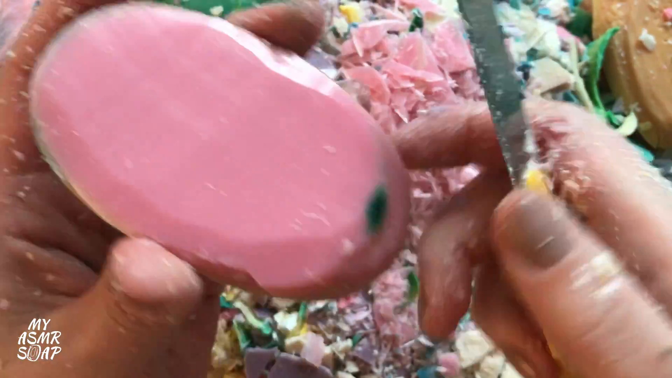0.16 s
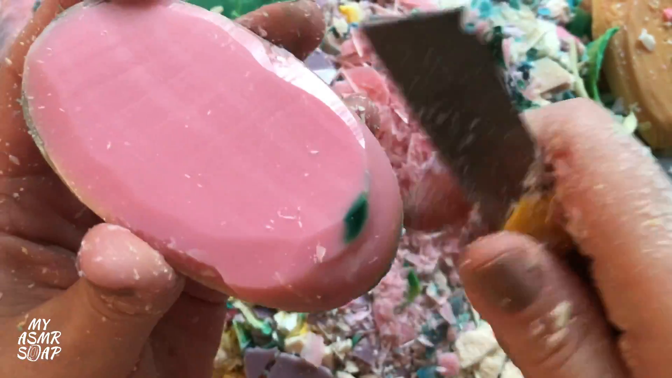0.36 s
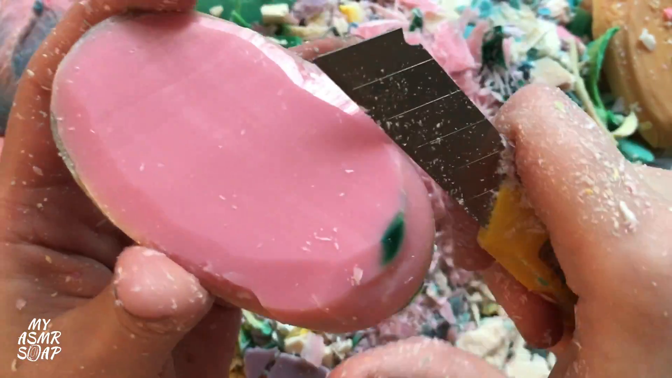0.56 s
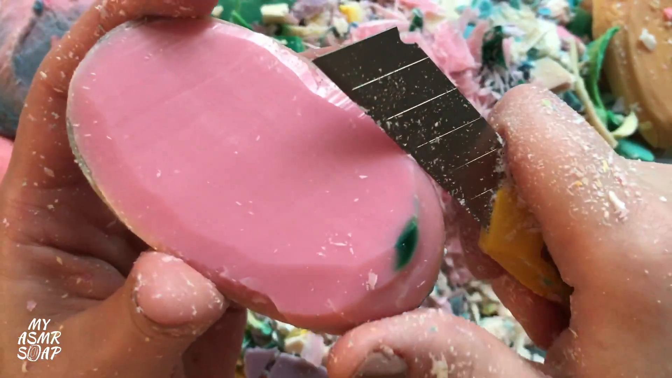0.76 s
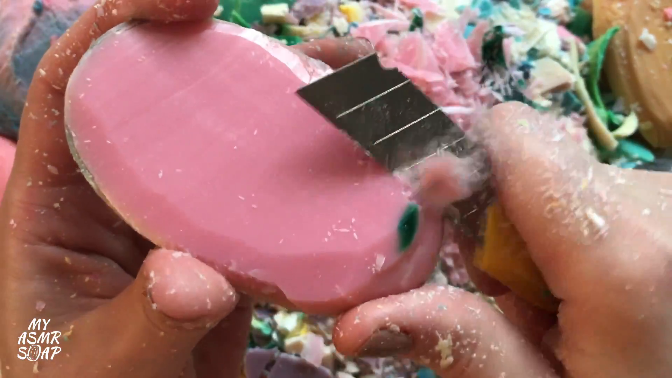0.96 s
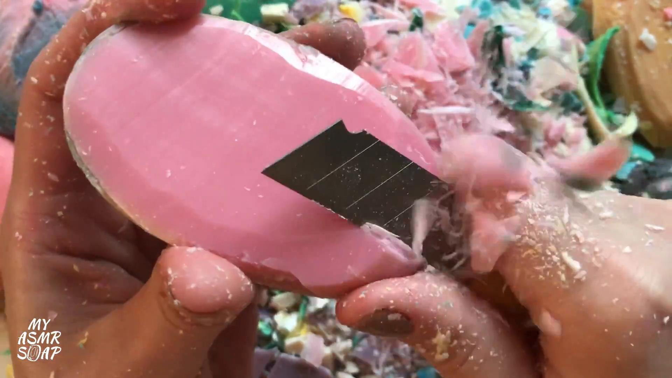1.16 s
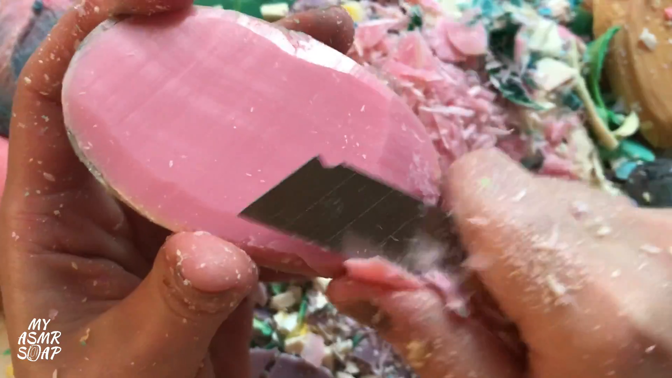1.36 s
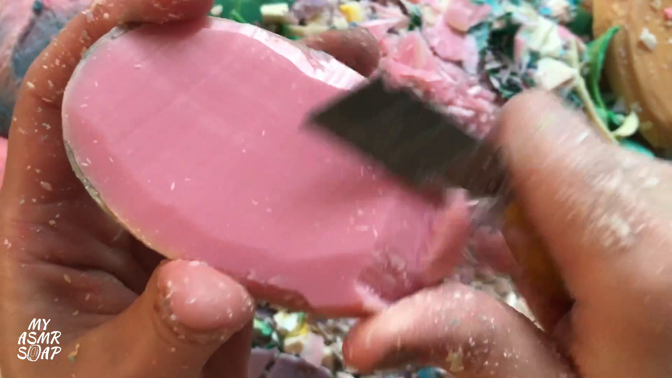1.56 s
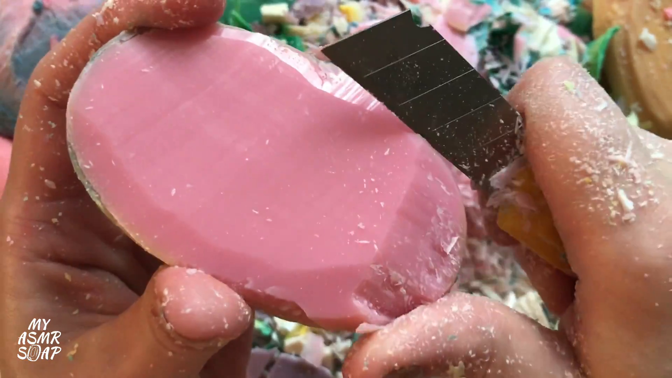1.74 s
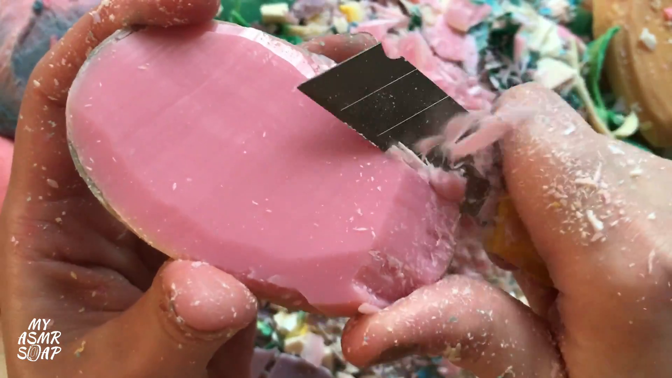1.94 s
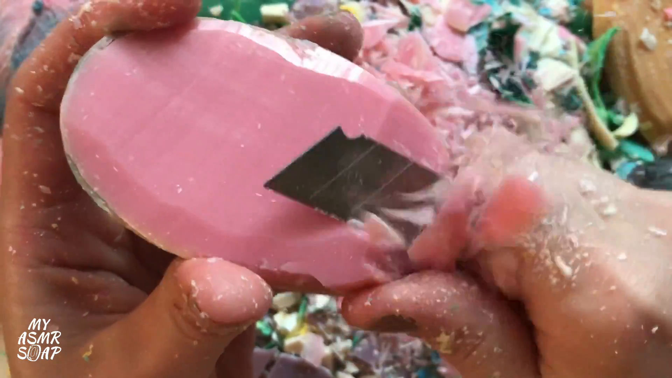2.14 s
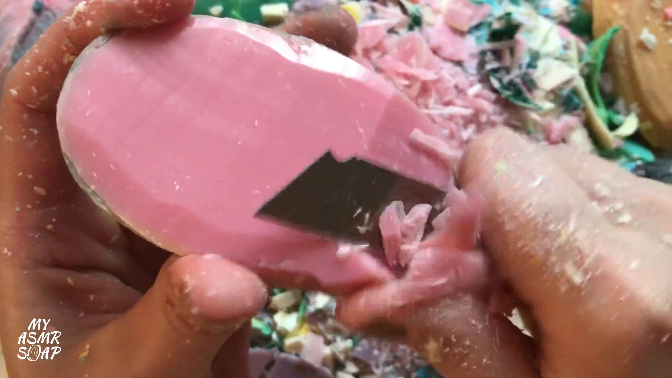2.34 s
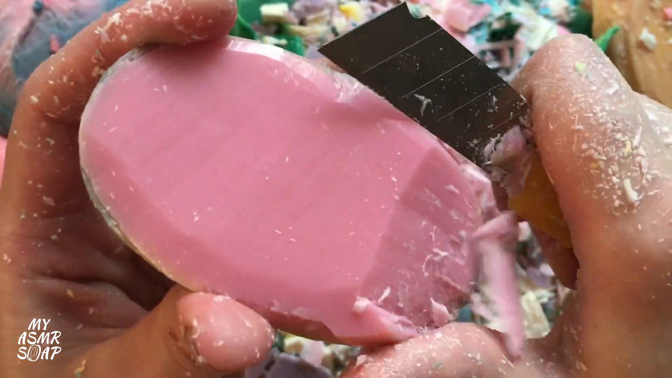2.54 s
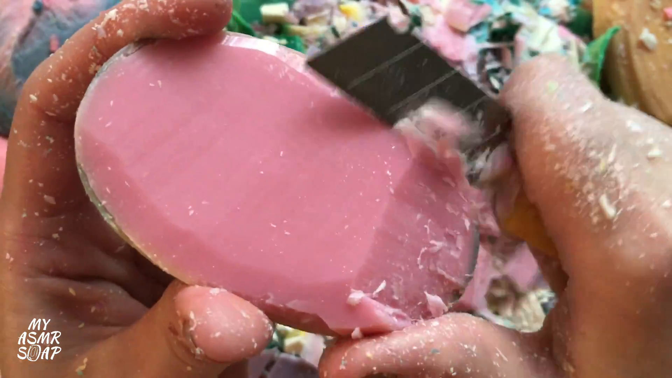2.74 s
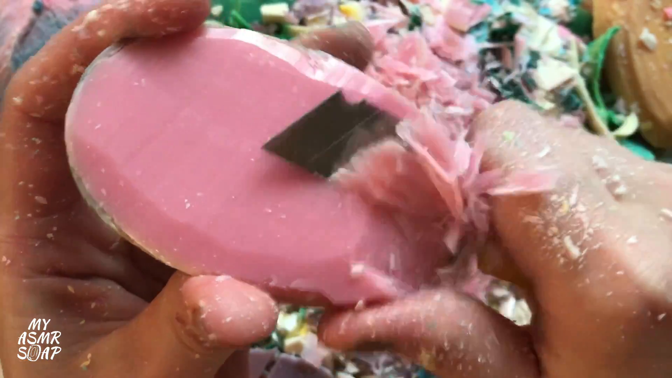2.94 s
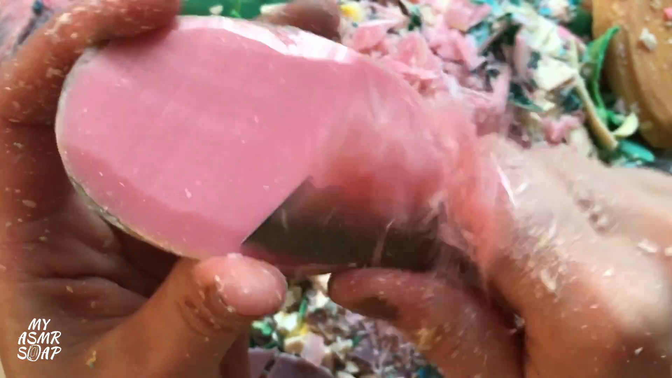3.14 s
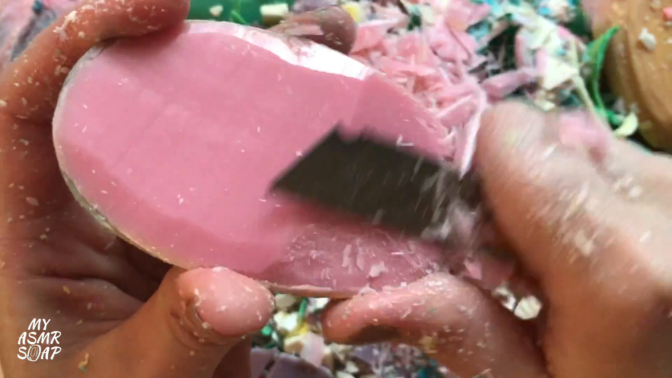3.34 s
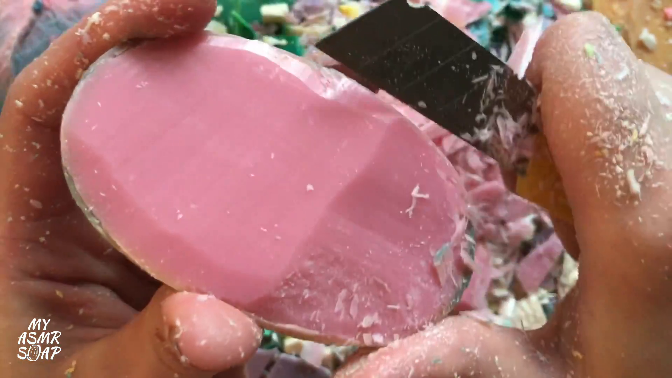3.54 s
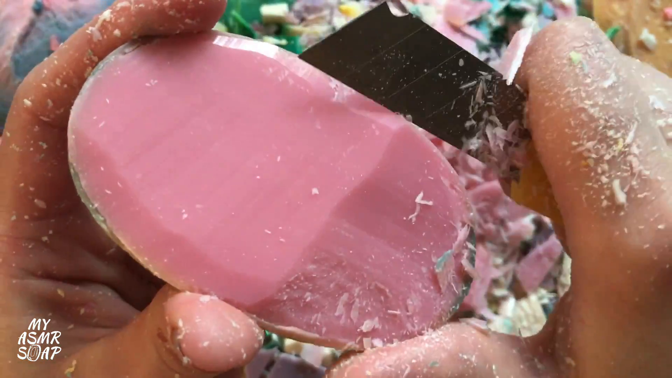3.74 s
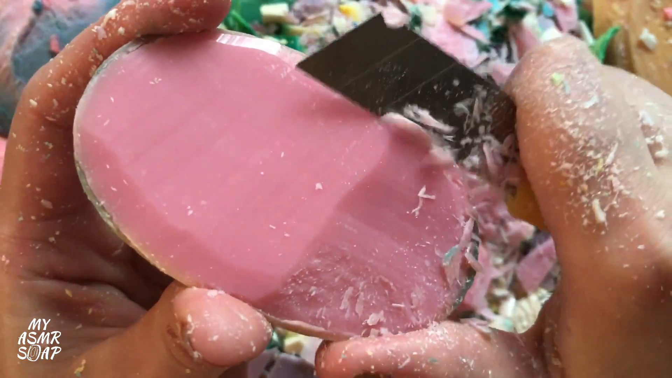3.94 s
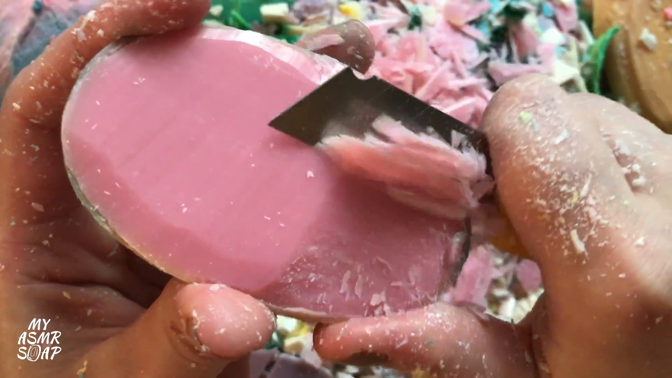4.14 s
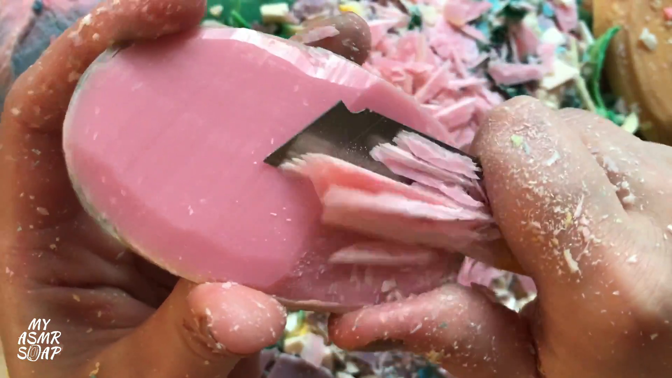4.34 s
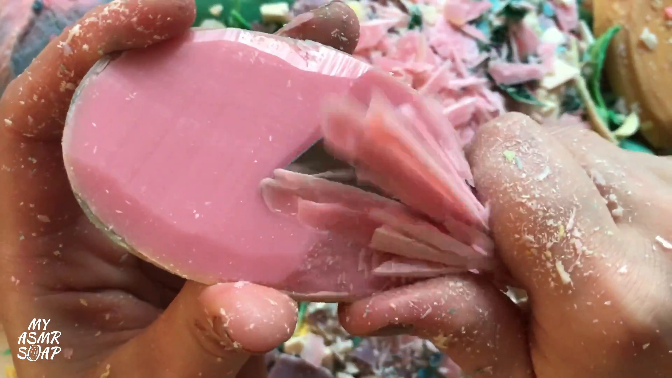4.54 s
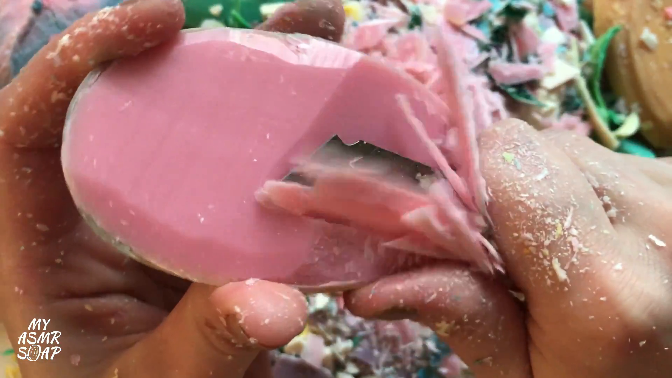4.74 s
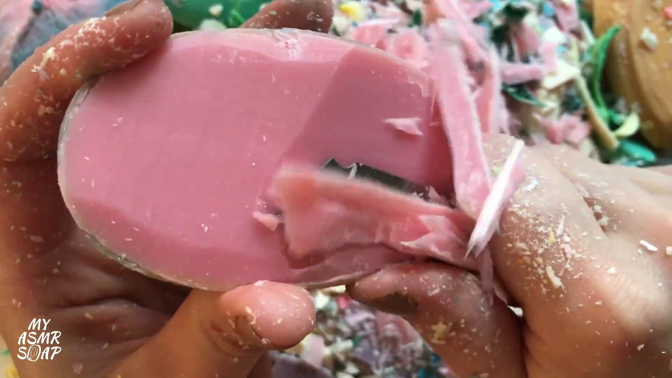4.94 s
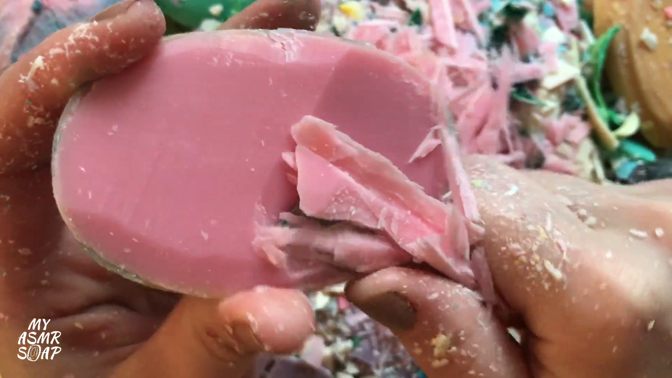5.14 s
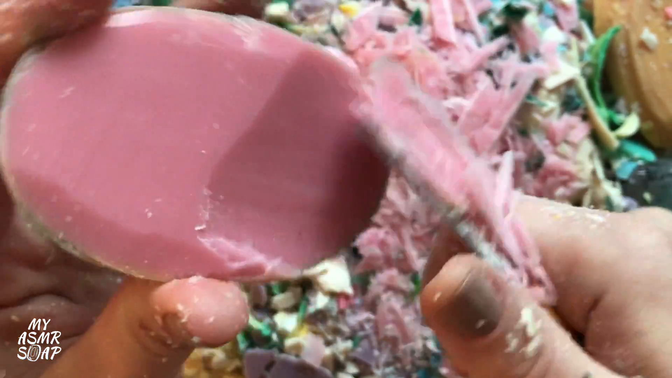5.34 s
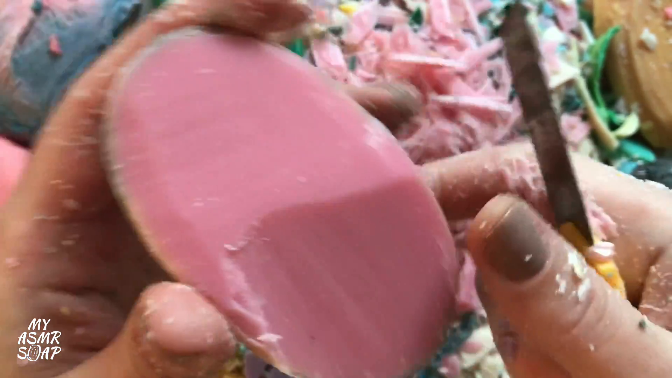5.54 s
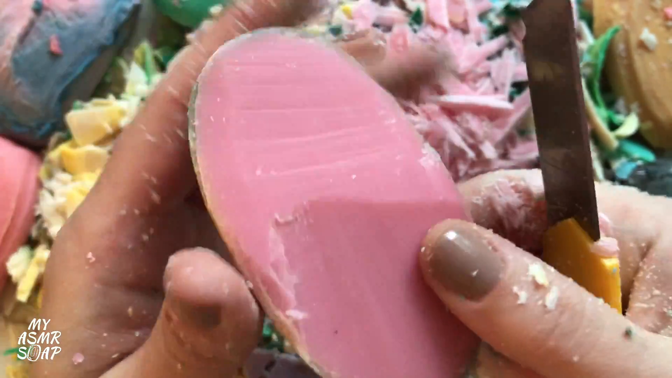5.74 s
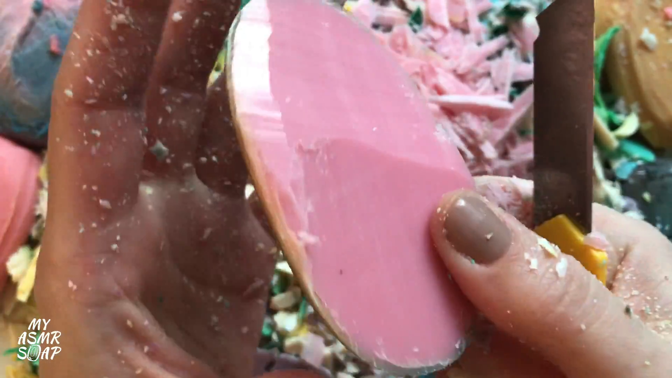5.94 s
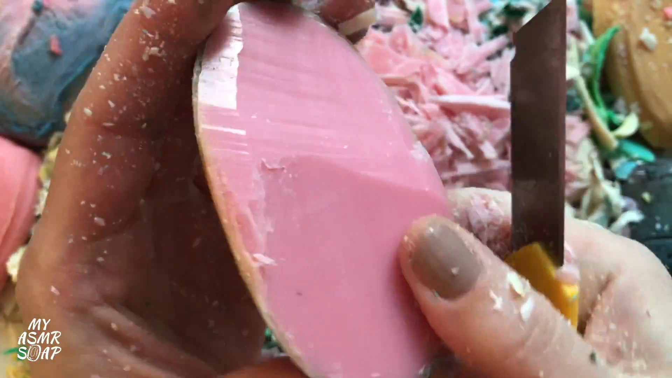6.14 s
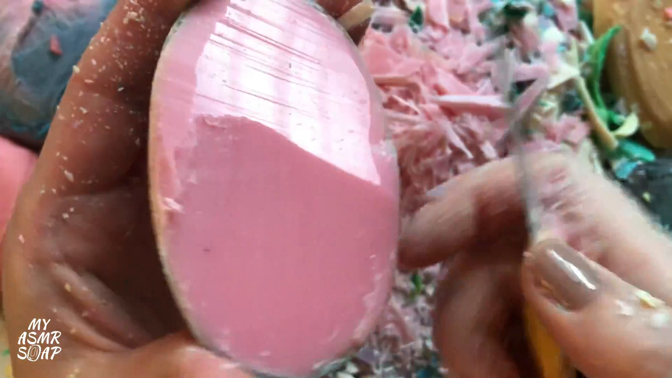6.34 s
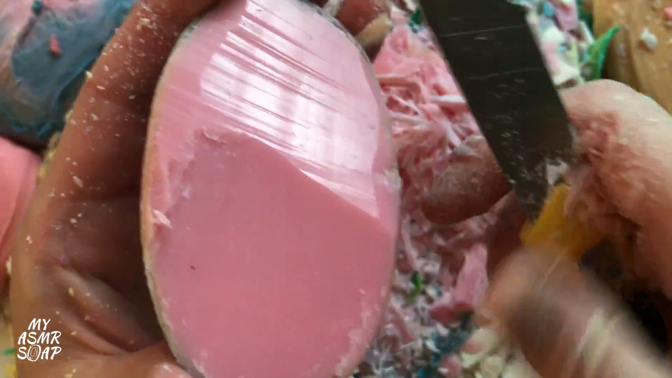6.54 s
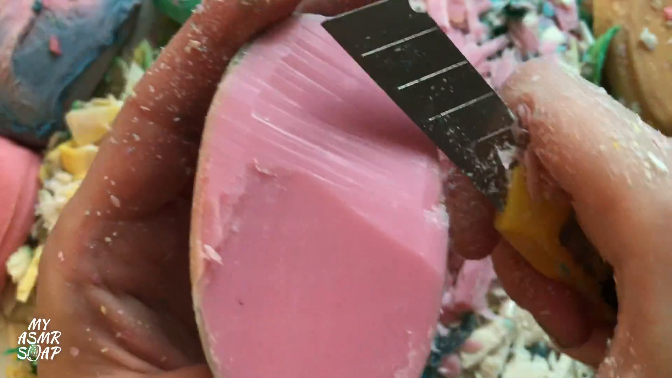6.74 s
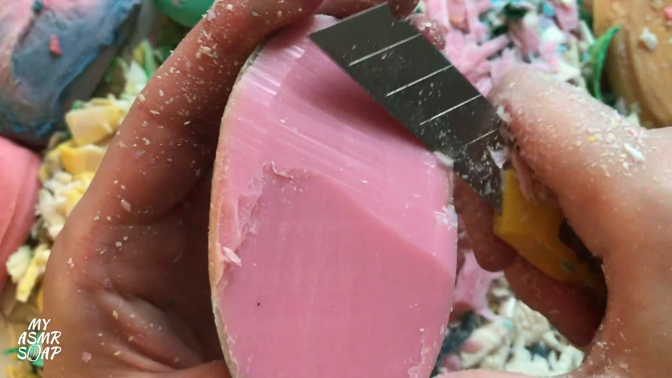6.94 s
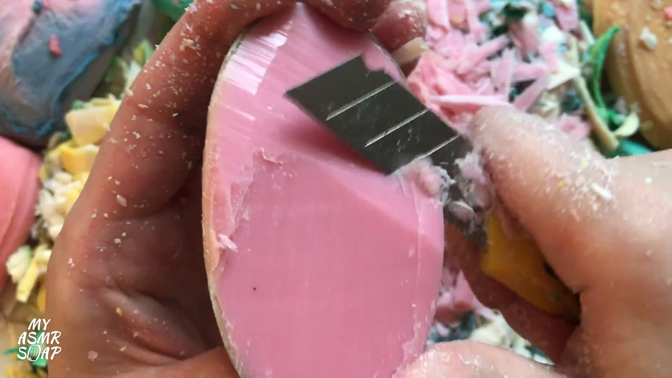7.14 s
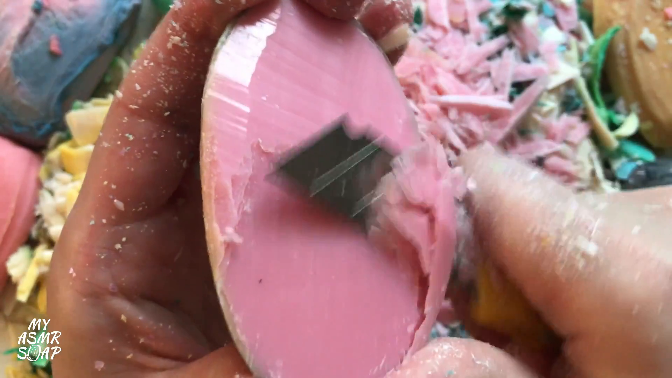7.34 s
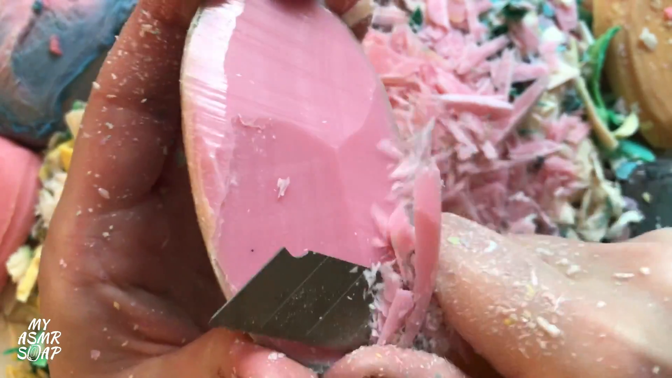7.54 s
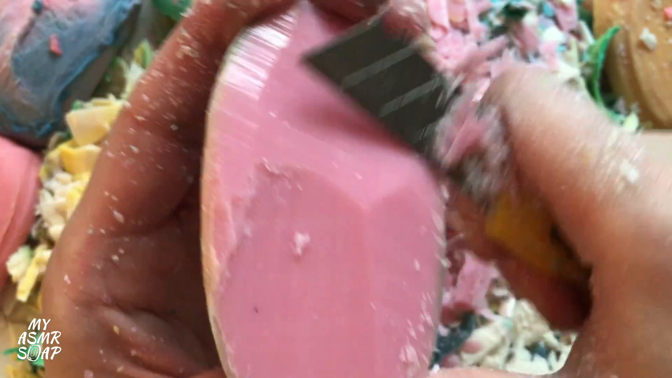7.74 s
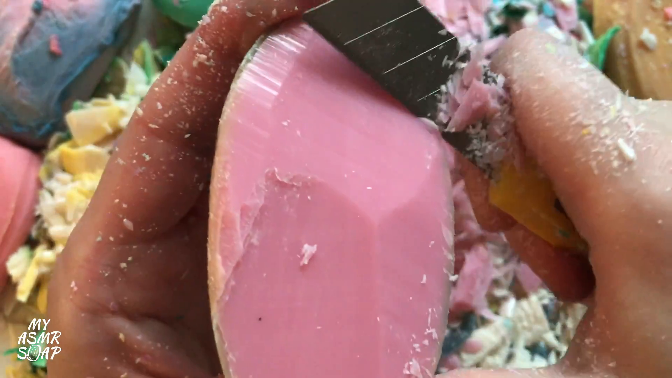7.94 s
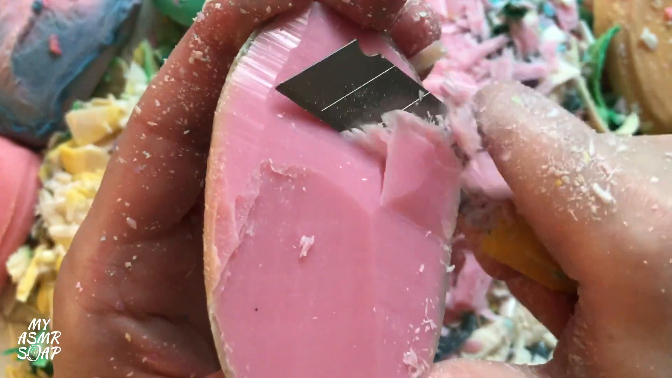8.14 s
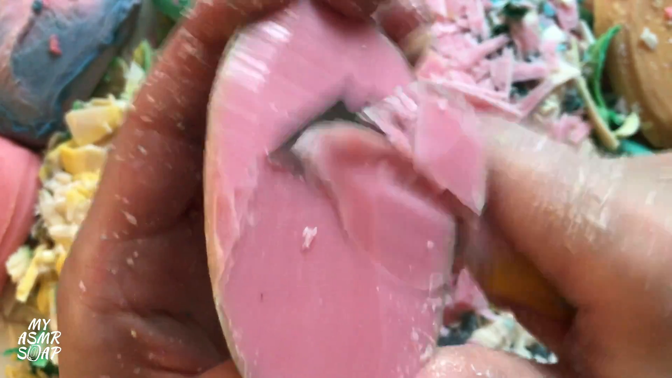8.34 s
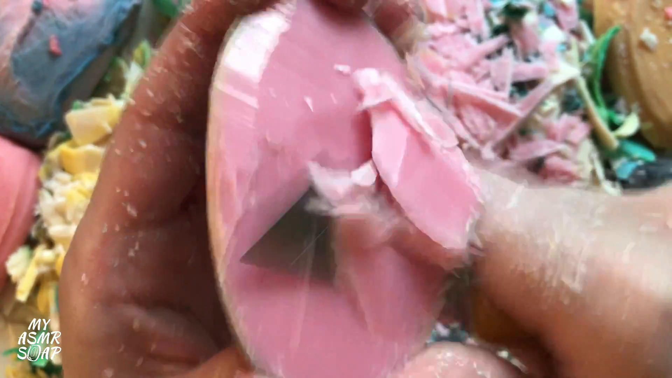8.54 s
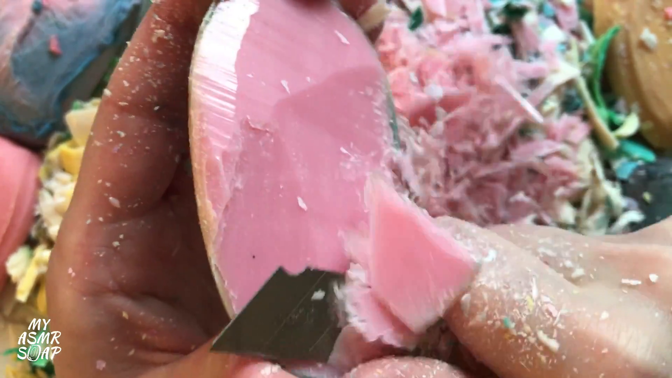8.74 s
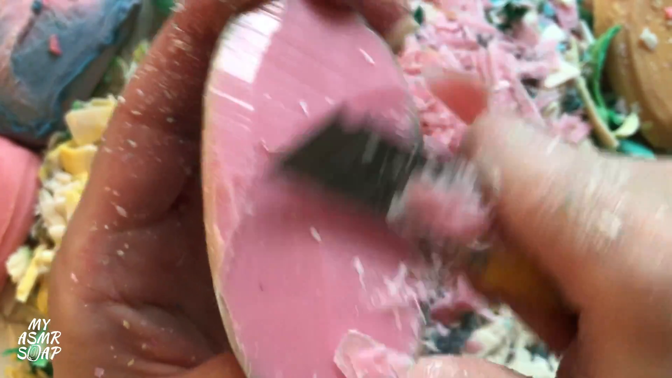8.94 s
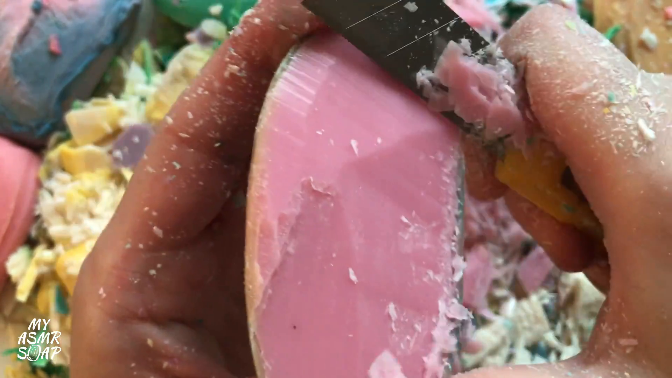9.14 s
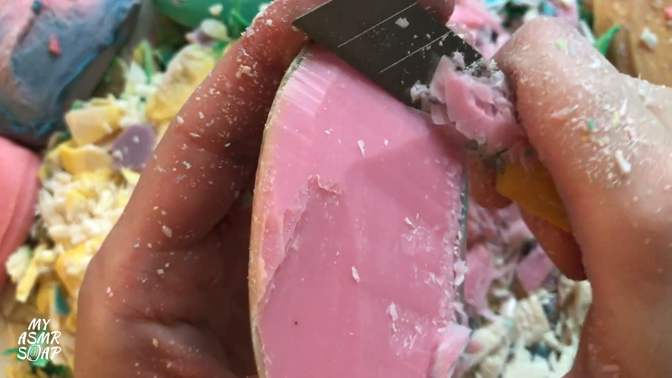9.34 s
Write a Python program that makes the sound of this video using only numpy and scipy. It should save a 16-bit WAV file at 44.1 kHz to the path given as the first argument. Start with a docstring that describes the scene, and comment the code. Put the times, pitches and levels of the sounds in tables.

```python
"""In a quiet room, close to the microphone, a snap-off knife blade shaves flakes off a dry bar of soap.
The room rumbles, hums and hisses faintly: shaped noise. The blade chatters in its holder: sparse taps on one mode.
Once the knife jumps out of the cut and knocks something hollow: two blows on decaying modes.
Crumbs crackle and the edge rubs: random ticks and hiss through the modes of blade and bar.
The soap breaks in short bursts of tiny cracks: swarms of noise pulses that ring those same modes."""
import sys
import numpy as np
from scipy import signal
from scipy.io import wavfile

SR = 44100
rng = np.random.default_rng(int(sys.argv[2]) if len(sys.argv) > 2 else 0)


def persist_wave(psi):
    """Save psi, clipped to +-1, as 16-bit WAV."""
    counts = np.round(np.clip(psi, -1, 1) * 32767).astype(np.int16)
    wavfile.write(sys.argv[1], SR, np.atleast_2d(counts).T)


N = 418509


def from_db(db):
    """Amplitude factor of a level in dB."""
    return 10 ** (np.asarray(db) / 20)


def rms_one(x):
    """Scale to an RMS of 1."""
    return x / np.sqrt(np.mean(x ** 2) + 1e-20)


def drift(rate_hz):
    """Slow random wandering of spread 1: noise at a fortieth of the rate, smoothed by a two-pole lowpass."""
    step = 40
    pole = np.exp(-2 * np.pi * rate_hz * step / SR)
    noise = rng.standard_normal(N // step + 2002)
    slow = signal.lfilter([1], [1, -2 * pole, pole * pole], noise)[2000:]  # drop the run-in
    return np.interp(np.arange(N) / step, np.arange(len(slow)), rms_one(slow))


def resonate(x, hz, width_hz):
    """Two-pole resonance with gain 1 on top."""
    pole = np.exp(-np.pi * width_hz / SR)
    feed = np.array([1, 0, -1]) * (1 - pole * pole) / 2
    feedback = [1, -2 * pole * np.cos(2 * np.pi * hz / SR), pole * pole]
    return signal.lfilter(feed, feedback, x + 1e-18)


def plateaus(rows, attack_db_per_s, release_db_per_s):
    """Power of events that rise, hold their level for their length and fall away."""
    t = np.arange(0, N, 32) / SR
    start, length, level_db = np.transpose(rows)[:, :, None]
    rise_loss_db = attack_db_per_s * np.maximum(start - t, 0)
    fall_loss_db = release_db_per_s * np.maximum(t - start - length, 0)
    power = np.sum(from_db(level_db - rise_loss_db - fall_loss_db) ** 2, 0)
    return np.interp(np.arange(N) / SR, t, power)


# Spectrum of the quiet room's air. Each row: pitch in Hz, relative density in dB per Hz.
AIR_SPECTRUM = [(12, -37), (20, -16.5), (55, -6), (79, -9.5), (117, -13), (179, -4.5), (230, -7),
                (428, -22), (839, -20.5), (2240, -33.5), (2660, -31), (6000, -40), (10500, -39),
                (15200, -37), (16500, -61.5)]
AIR_DB = -65


def air(patchy_db=.7):
    """Hiss and low murmur of the room: half-octave bands of noise, each flickering a little."""
    out, white = 0, rng.standard_normal((2, N))
    edges_hz = 20 * 2 ** np.arange(0, 10.1, .5)
    hz_points, db_points = np.transpose(AIR_SPECTRUM)
    for k, (low, high) in enumerate(zip(edges_hz, edges_hz[1:])):
        band_filter = signal.butter(2, [low, high], "band", fs=SR, output="sos")
        band = signal.sosfilt(band_filter, white[k % 2])  # neighbours use separate noises
        band_db = np.interp(np.log(low * high) / 2, np.log(hz_points), db_points)
        out = out + band * from_db(band_db + patchy_db * drift(8))
    return from_db(AIR_DB) * rms_one(out)


# Swells of far rumble. Each row: start in seconds, length in seconds, level in dB.
RUMBLE_SWELLS = [(0.0, .95, -64.5), (1.95, 0.16, -61), (2.5, 0.77, -71), (3.37, 0.048, -60.5),
                 (3.68, 0.46, -63.5), (4.43, 0.073, -65.5), (4.8, 0.097, -63), (5.3, 0.38, -63.5),
                 (5.83, 0.34, -58.5), (6.3, .75, -65), (7.6, 0.57, -65.5), (8.4, 0.36, -74)]
RUMBLE_EDGE_DB_PER_S = 150


def far_rumble():
    """Noise twice through a low resonance, swelling and sinking at a distance."""
    rumble = resonate(resonate(rng.standard_normal(N), 55, 22), 55, 22)
    power = plateaus(RUMBLE_SWELLS, RUMBLE_EDGE_DB_PER_S, RUMBLE_EDGE_DB_PER_S)
    return np.sqrt(power) * rms_one(rumble)


# Faint hums that come and go. Each row: pitch in Hz, width of each resonance in Hz, mean level in dB.
HUM_BANDS = [(93, 14, -78), (138.5, 20, -74), (179.8, 57, -68.5), (242, 29, -75)]


def hums(waver_db=3.0):
    """Noise twice through narrow low resonances, each swelling on its own."""
    out = 0
    for hz, width_hz, db in HUM_BANDS:
        hum = resonate(resonate(rng.standard_normal(N), hz, width_hz), hz, width_hz)
        out = out + from_db(db + waver_db * drift(2.2)) * rms_one(hum)
    return out


ROOM_T60_S, WALL_CUT_HZ = 0.16, 4400


def room(x):
    """Diffuse echo: dying noise, the treble dying sooner."""
    t = np.arange(SR // 2) / SR
    low, high = rng.standard_normal((2, len(t)))
    low = signal.sosfilt(signal.butter(1, WALL_CUT_HZ, fs=SR, output="sos"), low)
    low = low * from_db(-60 * t / ROOM_T60_S)
    high = high * from_db(-8.0 - 60 * t / (0.54 * ROOM_T60_S))
    echo = (low + high) * np.minimum(t / 0.0007, 1)
    return signal.fftconvolve(x, echo / np.sqrt(np.sum(echo ** 2)))[:N]


# The unloaded blade chattering faintly in its holder. Each row: start in seconds, length in seconds, level in dB.
CHATTER_SPELLS = [(.65, 0.039, -78), (.79, .08, -78.5), (6.2, 0.044, -77), (6.32, 0.18, -79.5),
                  (6.87, 0.2, -77), (9.3, 0.088, -78.5)]
CHATTER_HZ, CHATTER_WIDTH_HZ, CHATTER_EDGE_DB_PER_S = 2280, 340, 206


def chatter(per_s=140.0, size_db=5.0):
    """Sparse light taps ring one blade mode, passed twice through its resonance."""
    taps = (rng.random(N) < per_s / SR) * from_db(size_db * rng.standard_normal(N))
    ringing = resonate(taps, CHATTER_HZ, CHATTER_WIDTH_HZ)
    ringing = resonate(ringing, CHATTER_HZ, CHATTER_WIDTH_HZ)
    power = plateaus(CHATTER_SPELLS, CHATTER_EDGE_DB_PER_S, CHATTER_EDGE_DB_PER_S)
    return np.sqrt(power) * rms_one(ringing)


# A light touch, then the blow. Each row: time in seconds, strength in dB.
KNOCK_BLOWS = [(3.3865, -30), (3.3903, -14)]
# Modes of the hollow thing struck. Each row: pitch in Hz, level in dB, time to fall 60 dB in seconds.
HOLLOW_MODES = [(200, -26, 0.24), (266, -27, 0.22), (319, -8, 0.2), (436, -17, .1), (540, -17, 0.09),
                (715, -15, 0.04), (940, -8, 0.05), (1240, -17, 0.05), (1820, -8, .03)]
RATTLE_DB, RATTLE_T60_S, RATTLE_TOP_HZ = -8, 0.26, 1690  # loose shudder after a knock
# the jolted blade hissing out
SHIVER_DB, SHIVER_T60_S, SHIVER_HZ, SHIVER_WIDTH_HZ = -20.5, .33, 5000, 5000


def dying(blows, t60_s):
    """Envelope that jumps at each blow and decays exponentially."""
    return signal.lfilter([1], [1, -from_db(-60 / (t60_s * SR))], blows + 1e-18)


def knock():
    """Blows ring the hollow modes and leave a dull shudder and bright shiver; a small body radiates no deep bass."""
    blows = np.zeros(N)
    for s, db in KNOCK_BLOWS:
        blows[round(s * SR)] = from_db(db)
    dull_filter = signal.butter(3, RATTLE_TOP_HZ, fs=SR, output="sos")
    dull = signal.sosfilt(dull_filter, rng.standard_normal(N))
    bright = resonate(rng.standard_normal(N), SHIVER_HZ, SHIVER_WIDTH_HZ)
    shudder = from_db(RATTLE_DB) * dying(blows, RATTLE_T60_S) * dull
    shiver = from_db(SHIVER_DB) * dying(blows, SHIVER_T60_S) * bright
    out = shudder + shiver
    for hz, db, t60_s in HOLLOW_MODES:
        pole, turn = from_db(-60 / (t60_s * SR)), 2 * np.pi * hz / SR
        feed = [0, from_db(db) * np.sin(turn)]
        feedback = [1, -2 * pole * np.cos(turn), pole * pole]
        out = out + signal.lfilter(feed, feedback, blows + 1e-18)
    return signal.sosfilt(signal.butter(4, 170, "high", fs=SR, output="sos"), out)


# The edge slides through the soap. Each row: start in seconds, length in seconds, level in dB.
EDGE_SLIDES = [(.03, 0.06, -74), (.385, 0.022, -74), (.65, 0.034, -74), (.88, 0.14, -82),
               (1.27, 0.15, -63.5), (1.53, 0.042, -49.5), (1.66, 0.048, -76), (1.72, 0.018, -62),
               (1.77, 0.11, -80), (2.15, 0.066, -58), (2.36, .16, -64.5), (2.55, 0.12, -64.5),
               (2.74, 0.22, -56), (3.2, 0.063, -66), (3.315, 0.069, -56.5), (3.93, 0.051, -61.5),
               (3.995, 0.14, -56.5), (4.17, 0.11, -60.5), (4.35, 0.037, -58.5), (4.51, 0.056, -63),
               (4.6, 0.082, -65.5), (4.71, 0.059, -60), (4.83, 0.099, -60.5), (4.94, 0.048, -63),
               (5.17, 0.32, -76), (5.44, 0.041, -62.5), (5.5, 0.14, -73), (6.19, 0.24, -77),
               (6.93, 0.087, -66.5), (7.09, 0.042, -73), (7.2, 0.027, -61), (7.31, 0.019, -58.5),
               (7.36, 0.12, -74), (7.46, 0.089, -60.5), (7.61, 0.049, -59.5), (7.72, 0.053, -57.5),
               (7.79, 0.077, -67), (8.11, 0.019, -64), (8.22, 0.045, -83), (8.42, 0.14, -71),
               (8.57, 0.049, -52.5), (8.67, 0.076, -50.5), (8.78, .12, -62), (8.99, .08, -72),
               (9.3, 0.34, -71.5)]
SLIDE_ATTACK_DB_PER_S, SLIDE_RELEASE_DB_PER_S = 898, 347
HANDLING_DB = -83  # fingers and crumbs never quite rest
# crumbs run on: dB after a -20 dB crack, share of the crack's level they follow, decay
DEBRIS_DB, DEBRIS_FOLLOWS, DEBRIS_T60_S = -59.5, 0.51, .45


def crumbling_db():
    """Level of the crumbling: slides, the crumbs after each fracture and restless fingers, summed as power."""
    s, peak_db = np.transpose(FRACTURES)[:2]
    start_power = from_db(DEBRIS_DB + DEBRIS_FOLLOWS * (peak_db + 20)) ** 2
    starts = np.bincount((s * SR).astype(int), start_power, N)
    debris = signal.lfilter([1], [1, -from_db(-60 / (DEBRIS_T60_S * SR)) ** 2], starts)
    slides = plateaus(EDGE_SLIDES, SLIDE_ATTACK_DB_PER_S, SLIDE_RELEASE_DB_PER_S)
    return 10 * np.log10(slides + debris + from_db(HANDLING_DB) ** 2)


# Pitches in Hz where thump, blade, crack and sizzle are heard, in that order.
REGION_HZ = [700, 2500, 6000, 13000]


def tilt_at(hz, thump_db, blade_db, sizzle_db):
    """Level at one pitch against the crack, joined between thump, blade, crack (0 dB) and sizzle."""
    share = [np.interp(np.log(hz), np.log(REGION_HZ), row) for row in np.eye(4)]
    return share[0] * thump_db + share[1] * blade_db + share[3] * sizzle_db


# Modes of blade and bar that cracks and crumbs ring. Each row: pitch in Hz, width in Hz, level in dB before tilt.
BLADE_AND_BAR_MODES = [(311.3, 72, 11.5), (594, 410, 8), (964, 130, 6), (1550, 600, 2), (2170, 260, 8.5),
                       (2367, 140, 8.5), (3026, 450, 4.5), (4270, 760, 1.5), (5410, 540, 3.5),
                       (6147, 520, 3.5), (6780, 520, 4), (8910, 2000, -1.5), (9600, 280, -15),
                       (11920, 2300, 0), (14700, 1900, 5.5), (14500, 610, 7.5)]


def crumble(level_db, per_s=400.0, size_db=4.5, tick_ms=.5, rub_db=-5.0):
    """Random ticks in clumps over a rubbing hiss, through the modes of blade and bar."""
    born = rng.random(N) < per_s * from_db(4.0 * drift(40)) / SR
    sizes = born * from_db(size_db * np.minimum(rng.exponential(1, N), 3.0))
    ticks = signal.lfilter([1], [1, -np.exp(-1000 / (tick_ms * SR))], sizes)
    # the rub comes and goes as the edge grips and slips
    judder_db, wander_db = 5.0, 1.5
    rub = from_db(rub_db + judder_db * drift(70))
    push = (rms_one(ticks) + rub) * rng.standard_normal(N)
    out = 0
    for k, (hz, width_hz, db) in enumerate(BLADE_AND_BAR_MODES):
        mode_db = db + tilt_at(hz, -6.5, -6.0, -2.0) + wander_db * drift(30)
        out = out + (-1) ** k * resonate(push, hz, width_hz) * from_db(mode_db)
    return from_db(level_db) * rms_one(out)


# lesser splinters: mean dB over the crumbling and its spread, typical build-up and fade in ms
SPLINTER_DB, SPLINTER_SPREAD_DB, SPLINTER_MS = 11.5, 5, [.5, .8]
# mean thump, blade and sizzle in dB, and their spread
SPLINTER_TILT_DB, SPLINTER_TILT_SPREAD_DB = [-19.5, -4, -1], 8.5


def splinters(level_db, count=140):
    """Rows like those of the clear fractures, at chance moments, their level following the crumbling."""
    s, chance = rng.uniform(0, N / SR, count), rng.standard_normal((count, 6))
    over_db = SPLINTER_DB + SPLINTER_SPREAD_DB * chance[:, 0]
    peak_db = level_db[(s * SR).astype(int)] + over_db
    rise_fade_ms = SPLINTER_MS * 2 ** chance[:, 1:3]
    tilt_db = SPLINTER_TILT_DB + SPLINTER_TILT_SPREAD_DB * chance[:, 3:]
    return np.column_stack([s, peak_db, rise_fade_ms, tilt_db])


# The clearest fractures, close to the microphone. Each row: time of the peak in seconds, peak level in dB
# before the modes, build-up in ms, fade in ms, then thump, blade and sizzle in dB against the crack.
FRACTURES = [(0.119, -56.5, 0.6, 2.2, -14, 4, -2.0), (0.201, -51, 1.1, 1, -17, 1, -23),
             (0.8666, -47.5, 1.4, 6.3, -13.0, -14, -11), (0.8994, -35.0, 0.9, 1.8, -9.5, 1.5, -6),
             (0.9189, -29.5, 0.87, 1.5, -22.0, -20, -9.0), (0.9558, -21.5, 1.1, 3.7, -19, -7, -7),
             (1.0212, -31.5, 1.1, 2.5, -12, -7.5, -2), (1.0862, -31.5, 2.2, 3.2, -3.5, -4.5, 0),
             (1.1147, -12.5, 1.5, 3.9, -22.5, -8.0, -3), (1.1896, -32, 0.75, 0.37, -46, -18, -25.0),
             (1.202, -23, 1.3, 1.4, -51, -25, -15.5), (1.302, -41, 0.6, 1.8, -5, -1, 7.0),
             (1.3363, -21.5, 3.1, 1.7, -19, -6, -6.0), (1.3464, -32.5, 0.6, 1.5, -25, -5, -14),
             (1.392, -38, 0.4, 0.2, -7, 0.5, -3), (1.516, -33.0, 3.9, 0.52, -11, 3.0, -19),
             (1.5397, -37, 4.7, 6.4, -13, 6, -26), (1.553, -37, 0.43, 18, -11, 9.5, -28),
             (1.589, -34, 1.1, 1.5, -11, -13, 0.0), (1.673, -45.5, 1.5, 11.3, -6, 2.5, -1.5),
             (1.7793, -29, 0.36, 0.88, -13.5, 2.5, -9), (1.8344, -45.0, 1.2, 5, -2.5, 1, -2),
             (1.8725, -33.0, 1.6, 3.6, -6, -6, -7), (1.9162, -33.5, 1.2, 4.8, -5.5, 0.5, -6),
             (1.9334, -33.5, 0.5, 0.2, -12, -13, -2), (1.9715, -36.5, 0.45, 0.6, -34.0, -16.0, -4),
             (2.0126, -24.5, 2.3, 2.4, -3, -9.0, -2.5), (2.063, -15.5, 2.3, 1.7, -11, -14.5, -2),
             (2.1396, -18.0, 2.2, 3.4, -12.5, -11.5, -4), (2.1731, -31.5, 0.68, 2.8, -19, -10.0, -10),
             (2.24, -31.5, 0.39, 0.7, -24, -26, -2), (2.365, -44.5, 0.93, 10, -7, 6.5, 10),
             (2.4282, -41.5, 1.1, 2.2, -19, 3.0, -15), (2.445, -37, 0.58, 1.8, -31, -3, -29),
             (2.5016, -44.5, 1.1, 4.2, -8.5, 10.5, -9), (2.566, -40, 0.5, 0.18, -24.0, -14, -20.0),
             (2.5958, -44.5, 0.83, 3.7, -8, 7, -5), (2.715, -45, 6.6, 1.3, -5, 1, -3),
             (2.7476, -41.0, 2.0, 3.8, -4, -2, -3.0), (2.774, -32, 1.1, 1.6, -5, -19, -7.0),
             (2.7816, -37, 0.65, 1.8, -15, -8.0, -1), (2.794, -41.5, 0.4, 2.2, 4.5, 13.5, 6),
             (2.8237, -35, 1, 4.4, -6.5, -6, -3), (2.8615, -38, 3.2, 3.6, -6, -7, 1),
             (2.903, -34.5, 3, 1.8, -5.5, -7, 0), (2.9183, -37, 0.4, 2.7, -17.0, -14, 2.0),
             (2.9313, -32, 1.1, 1.4, 1.5, 5, 3), (2.9518, -30, 0.99, 2, -23, -11, 5),
             (2.9689, -18.5, 2.3, 3.8, -17.5, -12.5, -7), (3.001, -33, 0.78, 4.7, -17, -20, -11),
             (3.0384, -27.5, 0.34, 0.32, -34, -35, -24.0), (3.1436, -21, 2.26, 2.7, -16, -0.5, 2),
             (3.1593, -26, 0.55, 0.18, -21, -20, -5), (3.3188, -46.0, 0.6, 1.9, -16, 1, -5),
             (3.3787, -22, 0.53, 0.22, -14, -17, 6), (3.3909, -6, 0.91, 1.57, -3, -11.5, -12),
             (3.4287, -7.5, 1.1, 0.22, -12, -18, -30), (3.5219, -30.5, 0.71, 0.35, -21.0, -17, -17),
             (3.53, -38, 1.3, 0.2, -19, -22, -17), (3.5616, -38.5, 0.75, 0.62, -4, -19, -7),
             (3.7176, -61, 2.3, 2.3, -6, 17.5, 6.5), (3.8898, -35, 1.4, 2.5, -6.5, -7.5, -2.5),
             (3.9356, -51.0, 1.0, 6.6, 8.5, 4, -3), (4.003, -42.5, 2.2, 2.4, -14, -7, 1),
             (4.048, -39, 2.4, 2, -2.5, -6, -4), (4.0626, -29, 0.5, 0.22, -32, -24, 7),
             (4.141, -36.5, 0.6, 0.4, -15, -4, 5), (4.173, -35, 1.8, 0.18, -14, -5, -1),
             (4.2257, -30.5, 0.18, 0.3, -7, -12, 2.0), (4.2593, -45, 0.3, 0.4, -11.0, -11, 17),
             (4.3572, -44, 1, 1.8, -25.0, -6.0, 0), (4.3673, -38, 0.5, 0.6, -16, -16.0, 1),
             (4.3962, -37, 0.91, 0.26, -28.0, -22, 8), (4.5007, -32.5, 3.5, 4.3, -13, -5, -4),
             (4.627, -43, 5.8, 0.33, -17, -12, -12), (4.736, -47, 10.1, 2.6, -25, -6, -14),
             (4.7649, -44, 2.0, 1.7, -19.0, -6, -8), (4.8601, -40.0, 0.5, 0.3, -16, -18, -2.0),
             (4.879, -41, 0.7, 8.9, -24, -5.5, -1), (4.957, -35.5, 0.91, 0.92, -24, -8, -8),
             (4.9888, -45, 4.6, 0.76, -21, -19, -6.0), (5.07, -46, 0.4, 0.33, -13.0, -18, -1.5),
             (5.1348, -29, 0.54, 0.38, -13, 6, -4.0), (5.1658, -35.5, 0.86, 3.1, -1.5, -4, -8),
             (5.239, -56, 0.5, 0.92, -16.0, -10.0, 9), (5.4737, -50.5, 1.7, 0.4, -14, -13, 9.5),
             (5.6604, -57, 0.5, 1.1, -5, -8, 10), (6.1902, -46.0, 0.59, 0.74, -20, -8.0, 3),
             (6.2, -53, 0.5, 3.2, -22.0, 7, -8), (6.2758, -58, 0.6, 0.94, -15, 15, -12.5),
             (6.57, -53.5, 0.6, 3.5, -21.5, -3, -23), (6.8053, -58.5, 1.6, 1.9, -13, 9, -10.5),
             (7.0107, -52.5, 2.3, 2.9, -7, 6, 3.5), (7.0445, -45, 5.2, 3.3, -9, -6, -5.0),
             (7.0598, -46, 2.5, 3.8, -8, -11, -7), (7.1, -45.5, 3.2, 3.1, -16, -1, 0.0),
             (7.1164, -37, 0.68, 0.98, -31, 0, -12), (7.1568, -46.5, 0.52, 6.8, -18, -5, 1),
             (7.252, -43, 0.3, 0.4, -3, -3, 11), (7.2805, -43.5, 1.7, 2.4, 0, -8.0, 6),
             (7.3207, -41.0, 0.88, 3.9, -3, 0, 1), (7.3609, -39.5, 0.66, 10.4, -6, -7, 2.0),
             (7.385, -43, 3.3, 1.2, -6, -2, 2), (7.4054, -33.5, 3.3, 5, -11, -6.5, -3),
             (7.4435, -29.5, 3.6, 4.5, -19, -6, -3.5), (7.587, -44, 0.43, 0.3, -17, 2, -11),
             (7.6396, -53.5, 6.8, 1.5, -10.0, 15.5, -12.5), (7.659, -49.5, 10, 7.2, -18, 5, -1.5),
             (7.7209, -43.5, 4.2, 1.8, -10, 4.5, 0), (7.75, -39.5, 8.9, 10.4, -25, 3, -10),
             (7.827, -37.0, 1.1, 0.86, -20, -9, -7), (7.91, -39, 0.5, 2.3, -25.0, -13, -15),
             (7.9946, -32.5, 1.5, 1.2, -23, 10.5, 1), (8.0636, -41, 4.1, 2.1, -4, -2.0, -3.0),
             (8.1083, -24.5, 3, 2, -14, -9, -5.5), (8.2023, -21.5, 1.7, 1.44, -22, -3, -11.5),
             (8.2294, -28.5, 0.79, 0.3, -39, -10, -2), (8.2444, -42, 0.5, 0.5, -14.0, -19, 8),
             (8.3561, -17, 1.3, 6.8, -23, -8.5, -20), (8.386, -27.0, 3.3, 2.7, -16, -7.0, -3),
             (8.4462, -36.0, 0.55, 0.6, -33, -14.0, -9), (8.4595, -28.5, 0.57, 0.46, -33, -17.0, -6.0),
             (8.4988, -34.5, 0.68, 0.94, -36, -17.0, -2), (8.5634, -13.0, 2.7, 3.1, -29, -11.5, -6.5),
             (8.601, -35, 1.3, 2.2, -16.0, -2, -1), (8.6428, -25.5, 0.51, 0.73, -33, -18, -12),
             (8.708, -40, 0.41, 0.33, -16, -21.0, 7), (8.785, -39, 0.68, 0.84, -18, -26, 4),
             (8.8728, -45.5, 0.78, 1.6, -22, -23, 4), (9.012, -40, 0.92, 0.72, -6.0, 1.5, -7),
             (9.024, -34.5, 0.63, 1.4, -19.0, -7, -3), (9.2317, -48, 1.6, 1.2, -14, -9, -18),
             (9.2795, -47.5, 0.6, 0.45, -29, -15, -6), (9.365, -54.5, 1.5, 1.5, -21.0, 10, -8),
             (9.4327, -43, 0.6, 1.7, -12, -31, -9)]


def cracks(rows, spread_db=2.0, spiky_db=9.0, roundness=1.1):
    """Each fracture is a swarm of micro-cracks that builds up, then fades; each rings the modes in its own mix."""
    s, peak_db, rise_ms, fade_ms, thump_db, blade_db, sizzle_db = np.transpose(rows)[:, :, None]
    steps = np.arange(-900, 1500)
    ms = steps * 1000 / SR
    # 9 dB below the peak one build-up before it and one fade after it
    side_ms = np.maximum(np.where(ms < 0, rise_ms, fade_ms), .03)
    shape = from_db(-9 * np.abs(ms / side_ms) ** roundness)
    draws = rng.standard_normal((len(s), 2 * len(ms) + len(BLADE_AND_BAR_MODES)))
    spikes = from_db(spiky_db * draws[:, len(ms):2 * len(ms)])
    swarm = shape * draws[:, :len(ms)] * spikes
    # give the spiky swarm the energy of its smooth shape
    swarm = swarm * np.sqrt(np.sum(shape ** 2, 1) / np.sum(swarm ** 2, 1))[:, None]
    at = np.clip((s * SR).astype(int) + steps, 0, N).ravel()
    out = 0
    for k, (hz, width_hz, level_db) in enumerate(BLADE_AND_BAR_MODES):
        tilt_db = tilt_at(hz, thump_db, blade_db, sizzle_db)
        mix_db = level_db + tilt_db + spread_db * draws[:, [-1 - k]]
        push = np.bincount(at, (swarm * from_db(peak_db + mix_db)).ravel(), N)[:N]
        out = out + (-1) ** k * resonate(push, hz, width_hz)  # alternate signs between modes
    return out


ROOM_DB = -19.5


def scene():
    """Knife and soap up close, their echo, and the quiet room behind."""
    level_db = crumbling_db()
    fractures = cracks(np.vstack([FRACTURES, splinters(level_db)]))
    hands = fractures + crumble(level_db) + chatter() + knock()
    background = air() + far_rumble() + hums()
    return (hands + from_db(ROOM_DB) * room(hands) + background)[None]


CUTOFF_HZ = 16900


def record(dry):
    """The microphone drops the deepest bass; the top is cut steeply."""
    dry = signal.sosfilt(signal.butter(2, 22, "high", fs=SR, output="sos"), dry)
    return signal.sosfilt(signal.cheby2(10, 60, CUTOFF_HZ, fs=SR, output="sos"), dry)


dry = scene()
out = record(dry)
persist_wave(out)
```